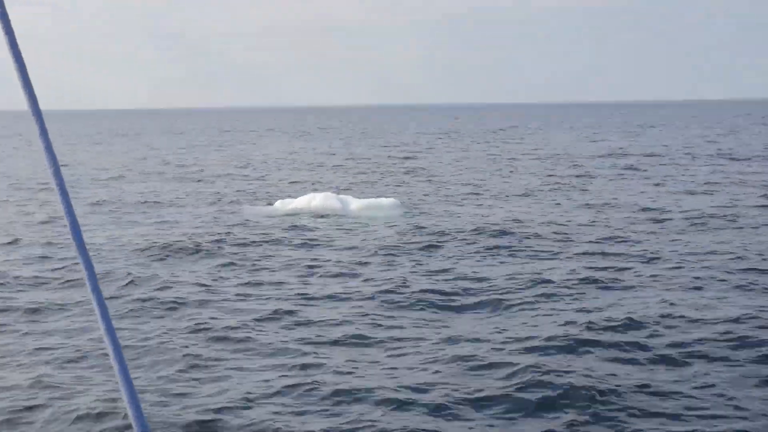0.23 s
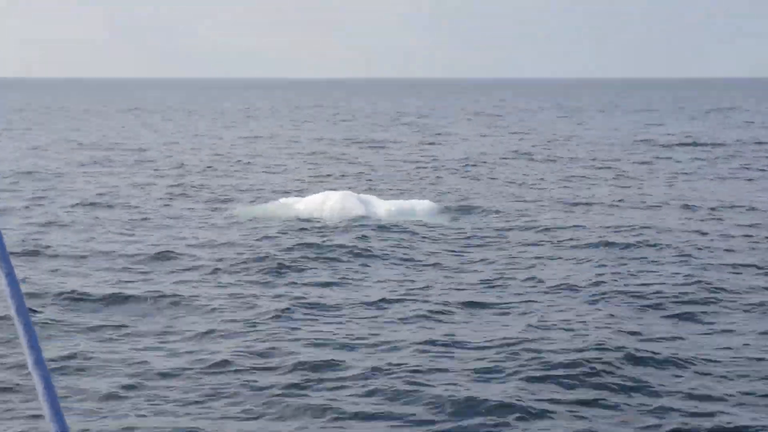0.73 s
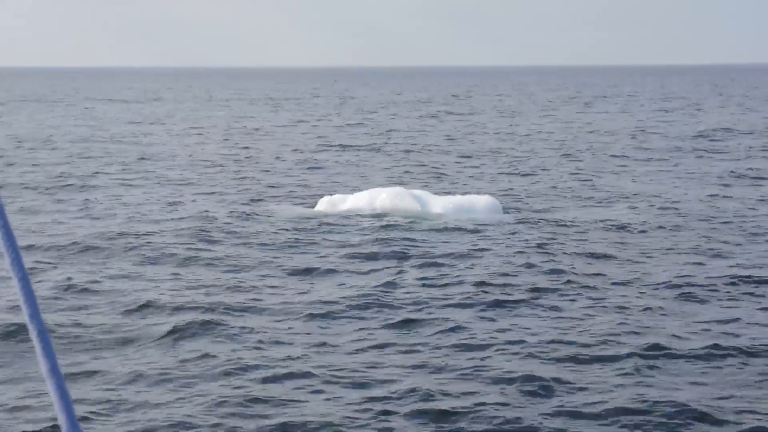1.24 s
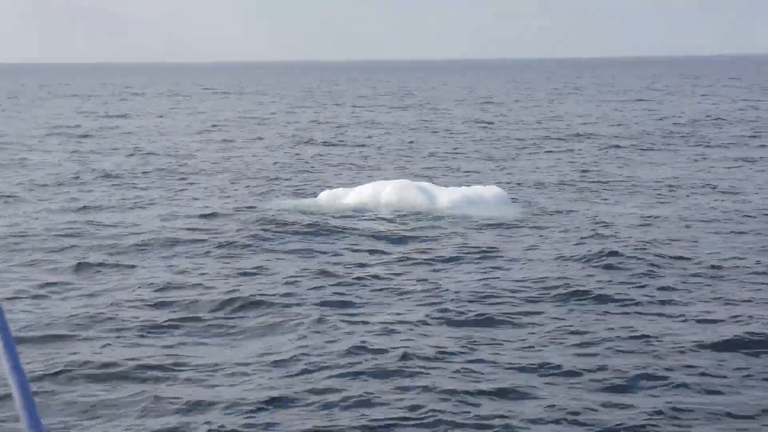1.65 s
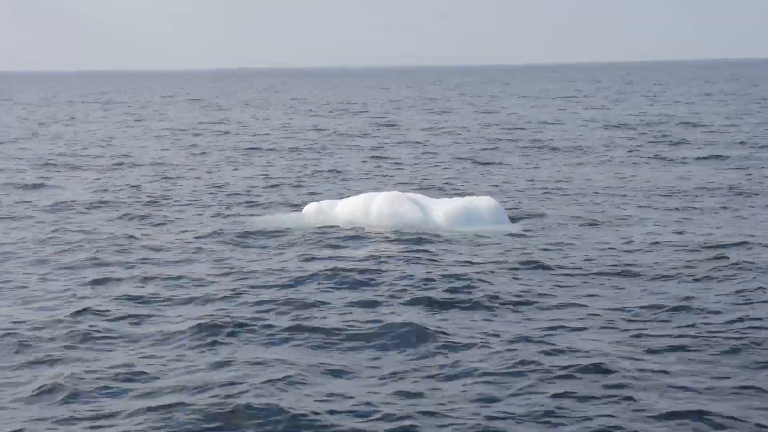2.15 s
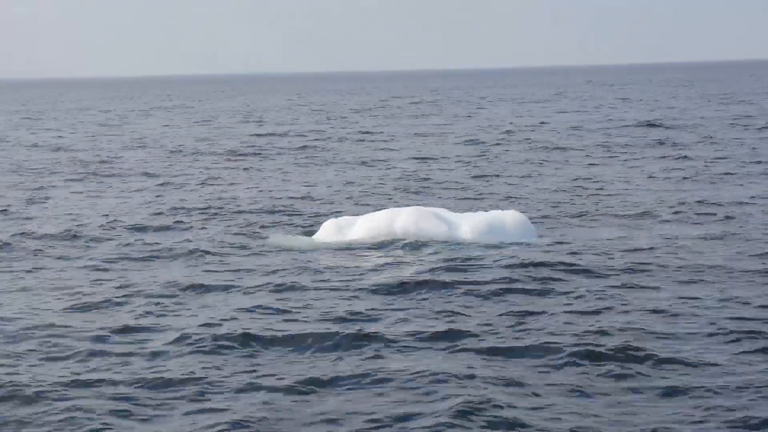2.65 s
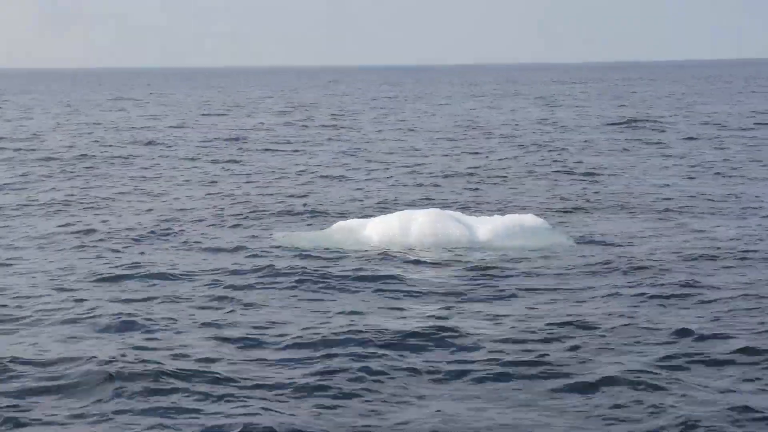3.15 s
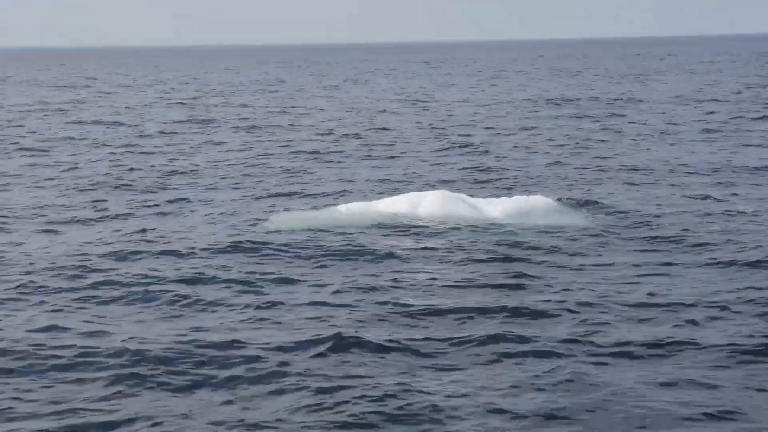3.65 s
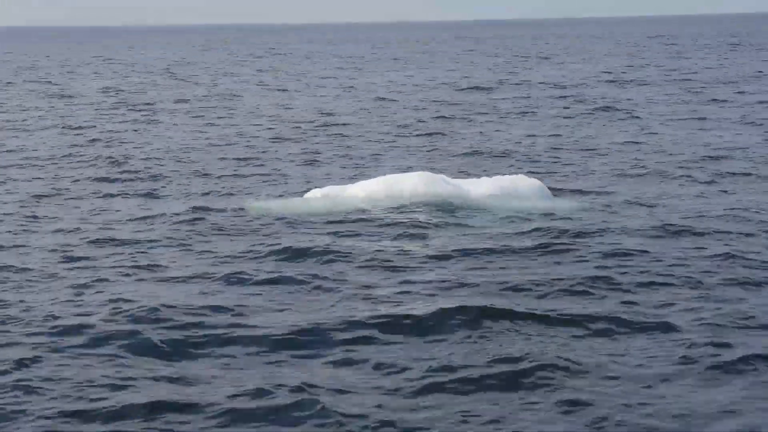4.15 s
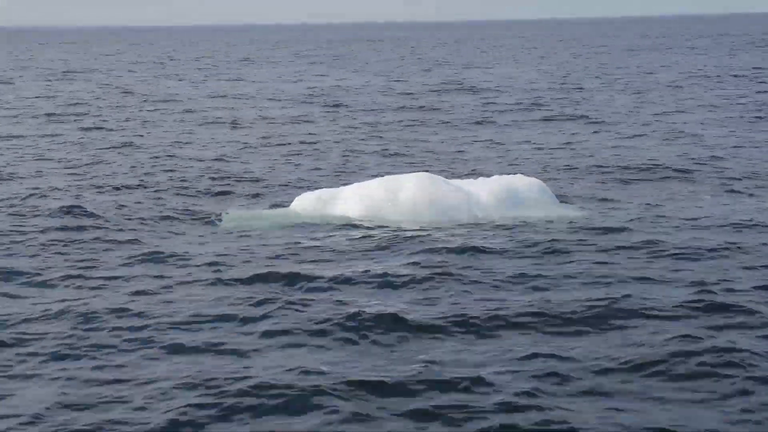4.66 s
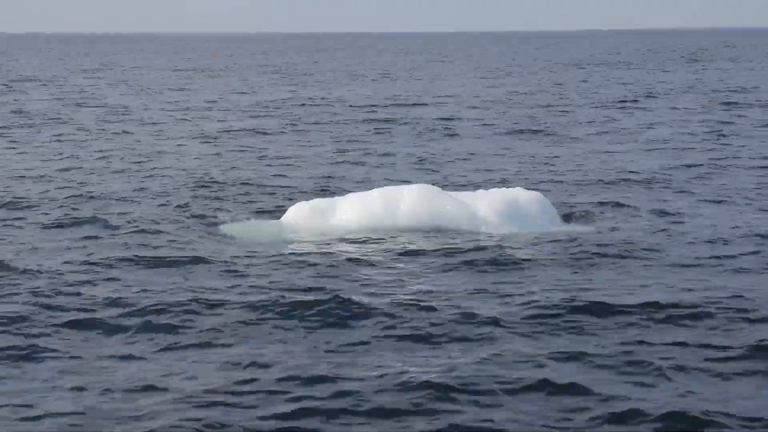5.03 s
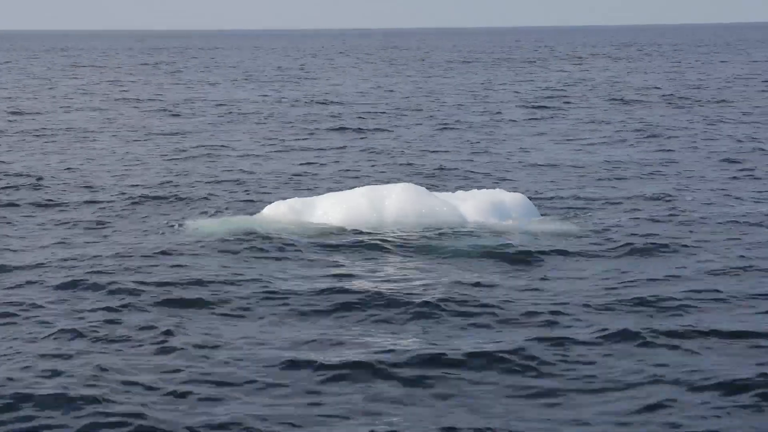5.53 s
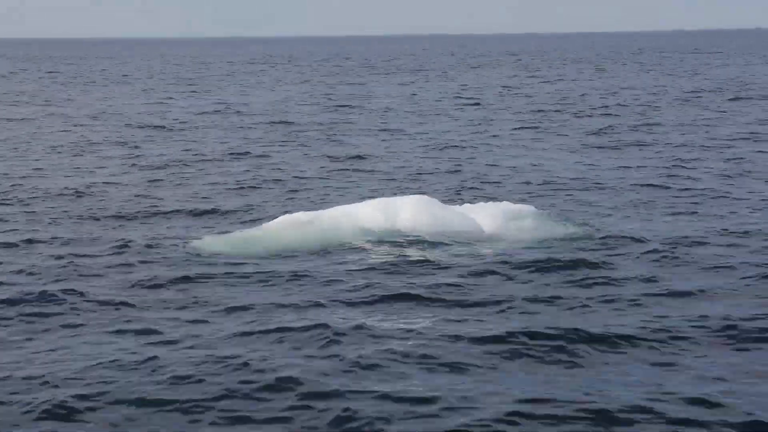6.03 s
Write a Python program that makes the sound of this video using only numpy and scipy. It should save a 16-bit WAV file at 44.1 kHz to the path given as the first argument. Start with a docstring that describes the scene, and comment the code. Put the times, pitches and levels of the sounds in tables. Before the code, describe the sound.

Open water heard from a moving boat, close and without echo. Wash swells and ebbs every half second or so, full of tiny bubbles and sparkling droplets, with a larger rush just after two seconds. Gusts flutter and thud deep in the bass, the hardest near one and two and a half seconds, briefly ducking everything, with thin faint clicks. Later the wind weakens, leaving more water, drips and low gurgles.

```python
"""Wind rumbles and thumps on a microphone on the deck of a sailboat at sea: shaped noise and pressure pulses.
The bow wave spills along the hull in surges, four layers of patchy noise that swell and ebb together.
Bubbles and spray droplets, short rising sine rings, sparkle in the wash and the fizzing foam.
Single drops and gulps of air ring out close by, over laps that ripple the water and a faint even hiss.
A limiter ducks the whole scene at the hardest thumps, two of them marked by a thin click."""
import sys
import numpy as np
from scipy import signal
from scipy.fft import rfft, irfft
from scipy.io import wavfile
from scipy.ndimage import uniform_filter1d

SR = 44100
rng = np.random.default_rng(int(sys.argv[2]) if len(sys.argv) > 2 else 0)


def store_pcm(level_fs):
    """Save levels as 16-bit WAV."""
    pcm = np.round(np.clip(level_fs, -1, 1) * 32767).astype(np.int16)
    wavfile.write(sys.argv[1], SR, np.atleast_2d(pcm).T)


N = 277433
TIME = np.arange(N) / SR


def amp(db):
    """Decibels to gain."""
    return 10 ** (np.asarray(db) / 20)


def unit(x):
    """Scales to rms 1."""
    return x / np.sqrt(np.mean(x ** 2) + 1e-20)


def noise():
    """White noise as long as the scene."""
    return rng.standard_normal(N)


def at_hz(points, hz):
    """Reads a curve of points on a log-frequency axis."""
    point_hz, value = np.transpose(points)
    return np.interp(np.log(hz + 1), np.log(point_hz), value)  # + 1 keeps 0 Hz finite


def gains(table):
    """One gain curve for each dB column of a table that starts with time."""
    times, *columns = np.transpose(table)
    return [amp(np.interp(TIME, times, column)) for column in columns]


def add(mix, s, sound):
    """Mixes a sound in at time s."""
    part = mix[max(round(s * SR), 0):][:len(sound)]
    part += sound[:len(part)]


def colour(x, spectrum):
    """Filters by a spectrum, to rms 1."""
    gain = amp(at_hz(spectrum, np.fft.rfftfreq(N, 1 / SR)))
    return unit(irfft(rfft(x) * gain, N))


def patchy_noise(patch_db, flicker_db, patch_s, patch_hz):
    """Noise that swells in small patches of time and pitch, and flickers as a whole; both dB are rms."""
    window, hop = 256, 64
    z = signal.stft(noise(), nperseg=window, noverlap=window - hop)[2]
    frames = max(round(patch_s * SR / hop), 1)
    bins = max(round(patch_hz * window / SR), 1)
    patches = uniform_filter1d(rng.standard_normal(z.shape), frames, axis=1)
    patches = unit(uniform_filter1d(patches, bins, axis=0))
    flicker = unit(uniform_filter1d(rng.standard_normal(z.shape[1]), 2 * frames))
    z = z * amp(patch_db * patches + flicker_db * flicker)
    return signal.istft(z, nperseg=window, noverlap=window - hop)[1][:N]


def bubble(hz, cycles, rise=0.032):
    """A pocket of air rings and dies away, its pitch rising as it nears the surface."""
    u = np.arange(int(3 * cycles * SR / hz)) * hz / (cycles * SR)  # time in units of cycles / hz
    ring = u * np.exp(-u / 0.22)
    turns = cycles * (u + rise * (u * u - u) / 2)
    return ring / ring.max() * np.sin(2 * np.pi * turns)


def bubble_cloud(sizes, per_s, cycles, spread_db, count=40):
    """Bubbles of many pitches burst at random; most are tiny, a few stand out."""
    out = np.zeros(N)
    for hz in np.geomspace(sizes[0][0], sizes[-1][0], count):
        size = amp(spread_db * np.minimum(rng.exponential(1, N), 4))
        births = size * (rng.random(N) < per_s / count / SR)
        ring = bubble(hz, cycles * rng.uniform(1.0, 1.24))
        out += amp(at_hz(sizes, hz)) * signal.oaconvolve(births, ring)[:N]
    return out


# strength of the wind on the microphone, before the trims in wind():
# (time [s], rumble level [dB], finer flutter level [dB])
WIND_STRENGTH = [(0.0, -15, -35), (0.35, -17.5, -38), (0.7, -17.5, -34), (1.28, -21.5, -37.5),
                 (1.45, -14.5, -32), (1.7, -19.5, -36.5), (1.85, -16, -33), (2.2, -19.5, -37),
                 (2.45, -15.5, -32), (2.88, -23, -36), (3.03, -27, -38), (3.55, -21.5, -36),
                 (3.9, -17, -38), (4.25, -23, -35.5), (4.6, -19, -34.5), (4.8, -28.5, -39),
                 (5.15, -21.5, -32.5), (5.33, -27, -34), (5.6, -22.5, -34.5), (6.29, -26, -31.5)]
# spectra of the large eddies and of the flutter: (frequency [Hz], level [dB per Hz])
RUMBLE_SPECTRUM = [(8, -26), (18, 0), (30, 0.5), (55, 0.5), (80, -8), (110, -13), (160, -25), (300, -42.5),
                   (700, -97)]
FLUTTER_SPECTRUM = [(50, -11), (110, 2), (160, -0.5), (240, -5.5), (400, -16.5), (800, -24.5), (2500, -70)]


def wind():
    """A steady stream of eddies rumbles; the stronger ones shed a finer flutter."""
    rumble_gain, flutter_gain = gains(WIND_STRENGTH)
    eddies = colour(noise(), RUMBLE_SPECTRUM)
    # the eddies keep a like strength from one tenth of a second to the next
    eddies = unit(eddies / np.sqrt(uniform_filter1d(eddies ** 2, size=4400)))
    shedding = unit(1 + 0.24 * uniform_filter1d(eddies ** 2, size=600))
    flutter = colour(noise() * shedding, FLUTTER_SPECTRUM)
    # the steady rumble dips as each large eddy passes
    lull = np.prod([1 - 0.7 * np.exp(-((TIME - s) * hz) ** 2) for s, db, hz in BUFFETS], axis=0)
    rumble = amp(-0.5) * rumble_gain * lull * eddies
    return rumble + amp(0.5) * flutter_gain * flutter


# large eddies that strike the microphone: (time [s], peak level [dB], centre frequency [Hz])
BUFFETS = [(0.664, -6, 40), (0.891, -3.5, 41), (1.2, -7.5, 52), (1.364, -10, 40.3), (1.572, -6.5, 47.7),
           (1.85, -6, 37.4), (2.371, -2, 48.6), (2.648, -9.5, 49.3), (2.751, -9, 43.8), (2.915, -9.5, 39.7),
           (3.337, -8.5, 38.7), (3.776, -9.5, 47), (3.965, -8, 40), (4.261, -9, 36), (4.567, -10, 55.6),
           (5.467, -9.5, 37.8), (6.087, -8.5, 35)]


def buffets():
    """Each large eddy is one push of pressure with suction before and after it."""
    out = np.zeros(N)
    t = np.arange(-SR // 20, SR // 20) / SR
    for s, db, hz in BUFFETS:
        u = (np.pi * hz * t) ** 2
        push = (1 - 2 * u) * np.exp(-u)
        add(out, s + t[0], amp(db) * push)
    return out


# thin clicks as the recorder's limiter clamps down on the hardest thumps: (time [s], peak level [dB])
LIMITER_CLICKS = [(0.885, -30), (2.370, -50)]


def limiter_clicks():
    """The limiter's sudden clamp is heard as a thin click, drawn as a very short high ring."""
    out = np.zeros(N)
    for s, db in LIMITER_CLICKS:
        add(out, s, amp(db) * bubble(hz=11000, cycles=1.1))
    return out


# spectra of low churn, spilling crest, falling spray and foam: (frequency [Hz], level [dB per Hz])
CHURN_SPECTRUM = [(120, -34.5), (250, -1), (380, 1.4), (500, 0), (630, -0.5), (780, -2), (1100, -7),
                  (1800, -14.5), (4000, -39), (8000, -67.5)]
SPILL_SPECTRUM = [(300, -16), (700, -4), (1100, 0), (1400, -1), (1800, -0.5), (2000, -2.5), (2250, -5.5),
                  (2650, -3), (3100, -11), (3600, -13.5), (5000, -37), (12000, -64)]
SPLASH_SPECTRUM = [(1500, -25.5), (2500, -2.5), (3000, 3), (3600, -1.5), (4200, -3), (4700, -9.5),
                   (5500, -28), (8000, -22), (12000, -42)]
FIZZ_SPECTRUM = [(2500, -31.5), (4200, -0.5), (4800, 2.5), (5300, 2), (6100, 0.1), (7000, -3),
                 (8000, -10.5), (9500, -18), (11000, -27), (15000, -43.5)]
# size of the small bubbles and of the spray droplets, before the trims in sea():
# (pitch [Hz], relative level [dB])
BUBBLE_SIZE = [(500, -8), (1000, -1.5), (1750, 6.5), (2200, 2.5), (2650, -5), (3600, 2.5), (4500, -7.5)]
DROPLET_SIZE = [(3200, 3), (4500, -4), (6000, -0.5), (8000, -3.5), (9500, -14), (11000, -22)]


def sea():
    """Water churns low, the crest spills in a rush of bubbles, its spray falls back, and the foam fizzes."""
    churn_gain, spill_gain, splash_gain, fizz_gain = surges()
    churn = colour(patchy_noise(patch_db=0.7, flicker_db=0.97, patch_s=0.012, patch_hz=400), CHURN_SPECTRUM)
    spill = colour(patchy_noise(patch_db=1.7, flicker_db=0.9, patch_s=0.007, patch_hz=700), SPILL_SPECTRUM)
    splash = colour(patchy_noise(patch_db=1.5, flicker_db=1.9, patch_s=0.006, patch_hz=900), SPLASH_SPECTRUM)
    fizz = colour(patchy_noise(patch_db=2.0, flicker_db=0.37, patch_s=0.0046, patch_hz=1200), FIZZ_SPECTRUM)
    bubbles = amp(-13.5) * bubble_cloud(BUBBLE_SIZE, per_s=500, cycles=7.9, spread_db=4.5)
    droplets = amp(-9.0) * bubble_cloud(DROPLET_SIZE, per_s=600, cycles=5.7, spread_db=7.0)
    water = amp(2.1) * churn_gain * churn
    water += spill_gain * (amp(-0.07) * spill + bubbles)
    water += amp(-2.5) * splash_gain * splash
    water += fizz_gain * (amp(0.64) * fizz + droplets)
    # the water tumbles unevenly, lifting all its sounds at once
    tumble = amp(0.47 * unit(uniform_filter1d(noise(), size=500)))
    return tumble * laps() * water


# waves that spill along the hull, before the trims in sea(): (crest time [s], rise [s], fall [s],
# level [dB], then against that level: churn [dB], spray [dB], fizz [dB])
SURGES = [(0.05, 0.33, 0.25, -35, -1.5, -8.5, -20), (0.65, 0.48, 0.2, -44, 3, -6.5, -16),
          (0.851, 0.18, 0.25, -38, -5.5, -7.5, -24.5), (1.09, 0.16, 0.39, -40.5, -7.5, -6.5, -23),
          (1.73, 0.053, 0.36, -37, -0.7, -9.5, -27), (2.14, 0.28, .18, -30.5, -5, -8.5, -21.5),
          (2.3, 0.16, 0.17, -37, -3, -19, -18), (2.93, 0.33, .12, -53, 7, -0.5, -6.5),
          (3.19, 0.11, 0.26, -42, -12, -15, -18.5), (3.5, 0.31, 0.34, -34.5, -2.5, -7.5, -20.5),
          (3.89, 0.14, .13, -40.5, 2, -15, -18.5), (4.15, 0.26, 0.079, -40.5, -8.5, -15, -19),
          (4.62, 0.37, 0.15, -38, 0, -15, -16.5), (4.83, 0.21, 0.37, -39, -3, -14, -20),
          (5.48, 0.29, 0.35, -36.5, 0.5, -26, -16), (5.86, 0.2, 0.33, -41.5, 3.5, -3.5, -20.5),
          (6.05, 0.06, 0.26, -43, -12, -5, -24)]
# the steady wash between the waves, halfway through and before the trims in sea():
# (churn [dB], spill [dB], spray [dB], fizz [dB])
WASH_DB = (-45.5, -53, -56, -62.5)
WASH_GROWTH_DB_PER_S = 0.96
SURGE_EDGE = 1.18  # shape of rise and fall: 1 is a pointed crest, 2 a round one


def surges():
    """Gain curves of churn, spill, spray and fizz: each wave swells to its crest and ebbs into the wash."""
    growth = amp(WASH_GROWTH_DB_PER_S * (TIME - TIME.mean()))
    power = np.outer(amp(WASH_DB), growth) ** 2
    for crest, rise, fall, db, churn_db, spray_db, fizz_db in SURGES:
        away = np.maximum((crest - TIME) / rise, (TIME - crest) / fall)
        layers = amp(db) * amp([churn_db, 0, spray_db, fizz_db])
        swell = np.exp(-2 * np.abs(away) ** SURGE_EDGE)
        power += np.outer(layers ** 2, swell)
    return np.sqrt(power)


LAP_DB, LAP_HZ = 0.45, 8.2  # rms depth of the ripple, and the rate above which it fades


def laps():
    """Small laps ride on the waves: a slow random ripple in the level of the water."""
    spectrum = [(1, -12), (LAP_HZ / 2, 0), (LAP_HZ, 0), (4 * LAP_HZ, -40), (200, -120)]
    return amp(LAP_DB * colour(noise(), spectrum))


# near drops and gulps of air, before the lift in drips():
# (time [s], pitch [Hz], peak level [dB], ring length [cycles])
DRIPS = [(0.1132, 5800, -41, 14), (0.9479, 414, -20.5, 1.1), (1.021, 1580, -28.5, 7.2),
         (1.8395, 2000, -26, 7.1), (2.0153, 3650, -27, 5.4), (2.2044, 8300, -45, 6), (2.2737, 6000, -34, 5),
         (2.7058, 2640, -40, 12), (3.489, 3330, -29, 5.5), (3.579, 3790, -35, 13), (3.5998, 7700, -42, 5),
         (3.6833, 2040, -31, 8), (3.892, 2580, -33, 7.7), (4.1164, 7300, -38.5, 5),
         (4.1978, 2470, -32, 6.8), (4.243, 3800, -32.5, 4.6), (4.3774, 1750, -32, 6.7),
         (4.6483, 6100, -39, 9.1), (4.8926, 4995, -39, 11), (5.221, 560, -30, 4.9), (5.4868, 740, -24, 7.9),
         (5.4961, 780, -22, 3.9), (5.7259, 8040, -47, 5), (6.07, 3520, -32, 7.9)]


def drips():
    """Single drops and gulps of air ring close beside the hull."""
    out = np.zeros(N)
    for s, hz, db, cycles in DRIPS:
        add(out, s, amp(db) * bubble(hz, cycles))
    return amp(4.0) * out


# spectrum of the background hiss: (frequency [Hz], level [dB per Hz])
HISS_SPECTRUM = [(1000, 0), (10000, 0.56), (13000, 0), (16000, -2)]


def hiss():
    """A faint even hiss of steady, nearly flat noise."""
    return amp(-70.5) * colour(noise(), HISS_SPECTRUM)


def scene():
    """Wind and sea at one microphone, with the limiter's clicks, over the hiss."""
    return (wind() + buffets() + limiter_clicks() + sea() + drips() + hiss())[None]


LIMIT_DB, RECOVER_DB_PER_S = -5, 6.5  # peak ceiling, and how fast the gain comes back
EDGE_HZ = 15720  # top of the band


def record(dry):
    """A limiter ducks everything at peaks over the ceiling and recovers slowly; then the band limit."""
    over_db = np.maximum(20 * np.log10(np.abs(dry[0]) + 1e-9) - LIMIT_DB, 0)
    recovery = RECOVER_DB_PER_S * TIME
    duck_db = np.maximum.accumulate(over_db + recovery) - recovery
    duck_db = uniform_filter1d(duck_db, size=64)
    lowpass = signal.firwin(511, EDGE_HZ, window=("kaiser", 9), fs=SR)
    return signal.oaconvolve(dry * amp(-duck_db), lowpass[None], "same")


dry = scene()
out = record(dry)
store_pcm(out)
```